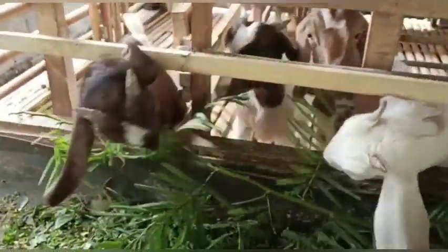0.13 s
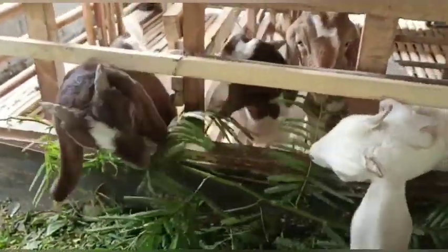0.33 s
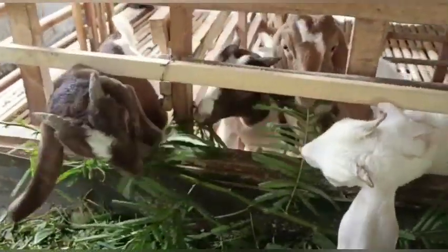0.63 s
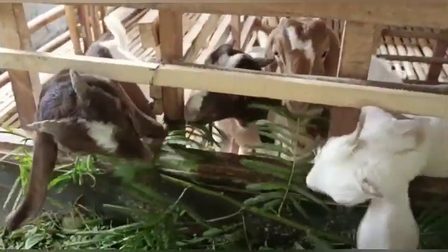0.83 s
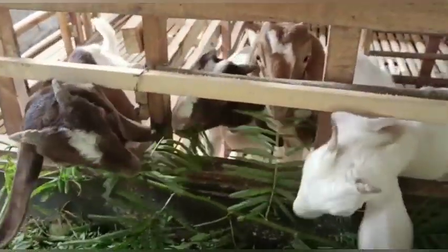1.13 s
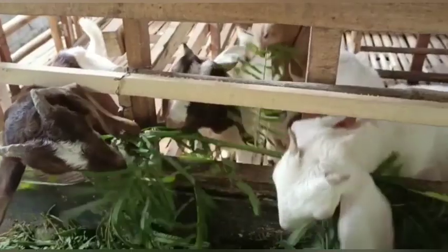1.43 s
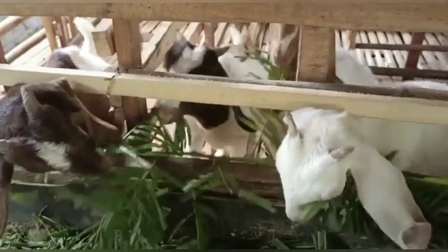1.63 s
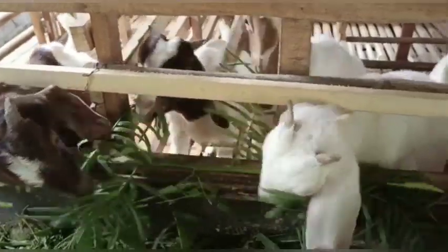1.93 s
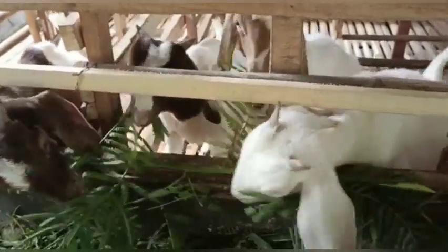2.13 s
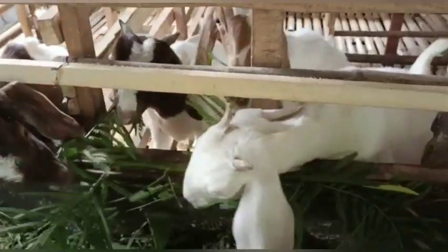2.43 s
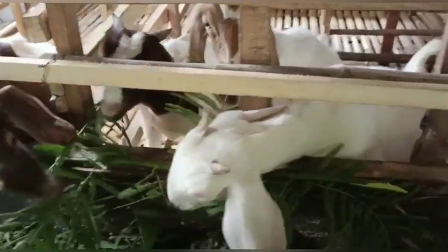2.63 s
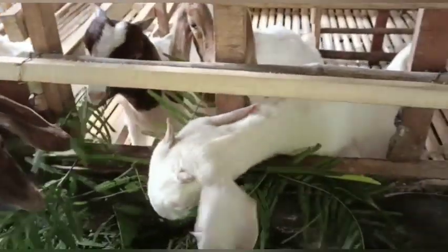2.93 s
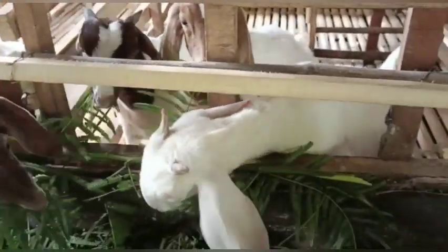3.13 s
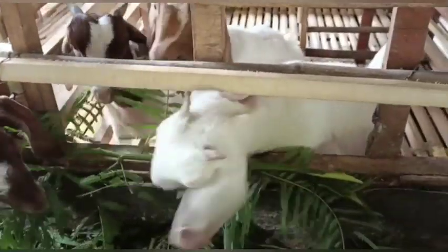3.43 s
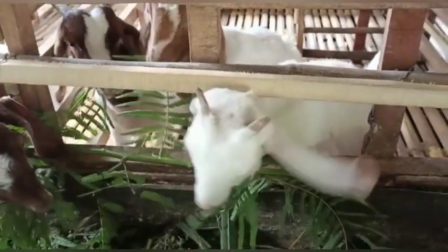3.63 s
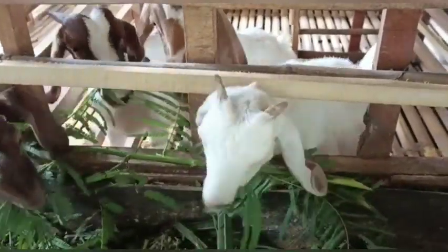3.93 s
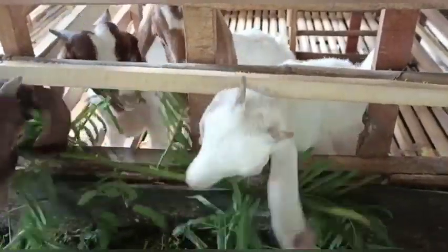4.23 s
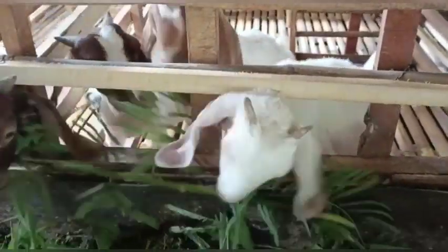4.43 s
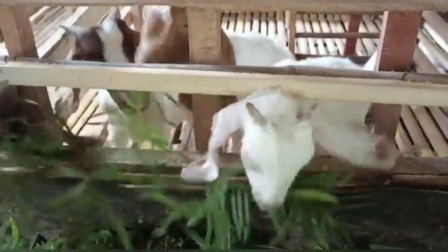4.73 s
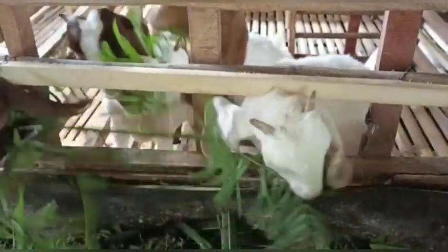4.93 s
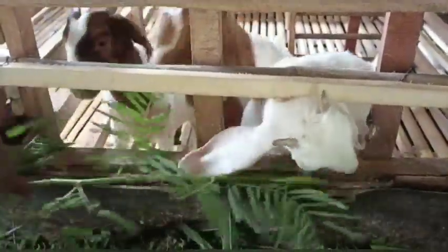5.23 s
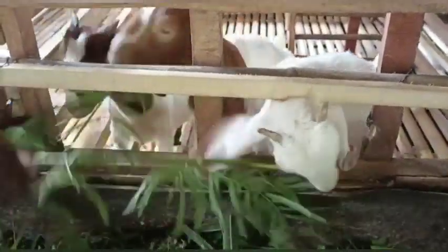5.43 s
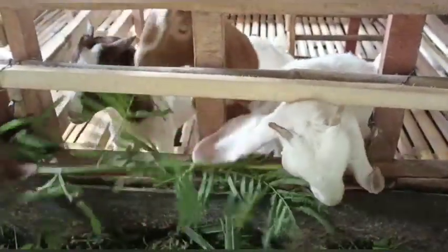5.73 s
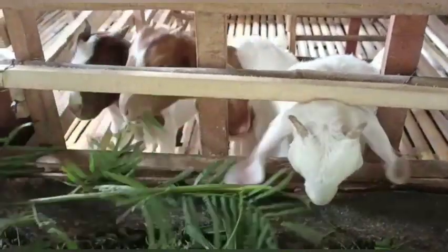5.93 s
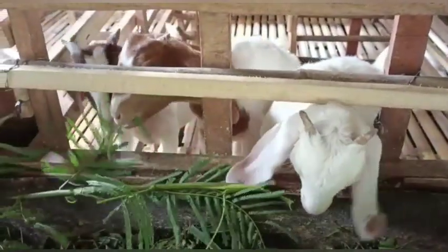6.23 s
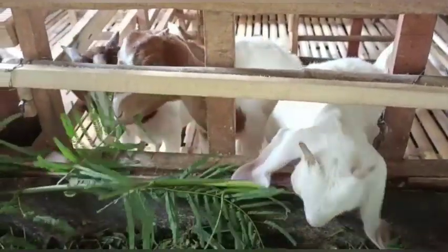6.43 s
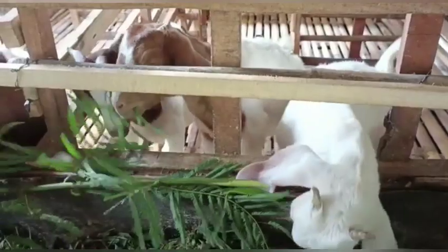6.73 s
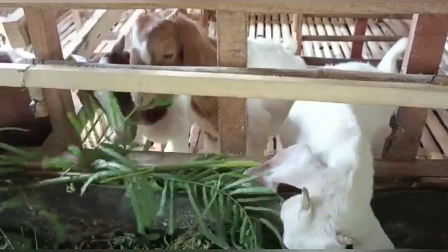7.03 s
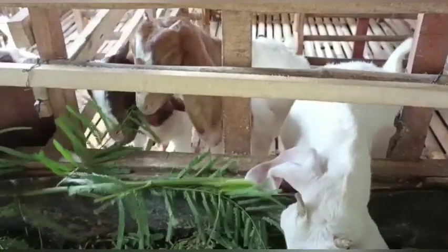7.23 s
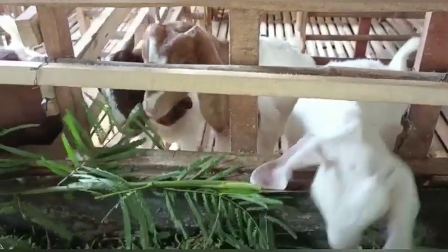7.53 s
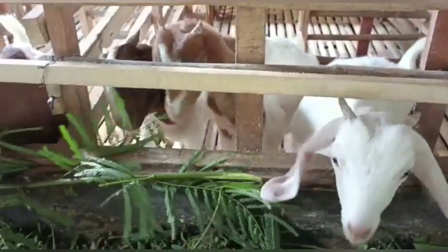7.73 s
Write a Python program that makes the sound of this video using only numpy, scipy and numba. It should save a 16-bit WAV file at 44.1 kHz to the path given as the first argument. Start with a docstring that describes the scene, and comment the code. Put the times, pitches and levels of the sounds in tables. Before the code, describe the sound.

A hoarse, nasal rasp, most likely a hand saw in timber, goes to and fro throughout in short uneven strokes, several a second. Each stroke rings with a slightly gliding honk and arrives mostly as short echo from a little way off. The strokes are fuller from about 3.5 seconds, ease briefly near 7 and return strongly just after. Closer by, goats feed in a slatted shed. Hooves and heads knock dully on the wooden pen around 1.5 seconds, in a cluster from 3.3 to 4, and again near 4.6, 5, 5.8 and 6.3. Stems snap sharply at about 1.2, 2.9, 3.6 and 5.8 seconds. Leaves rustle softly with each tug, most between 4 and 6 seconds. Brief wood squeaks come mainly in the first three seconds and again around 7. Underneath, the raised floor rumbles softly with shifting weight, over a faint, even wash of yard noise.

```python
"""A nasal rasp goes to and fro, most likely a hand saw, while goats feed at a trough in a slatted shed.
The saw is out of sight: its teeth make the timber and blade ring, and the honk arrives mostly as echo.
Rubbing wood squeaks, hooves and heads knock on the pen, stems snap and fodder leaves rustle.
Underneath, the raised floor rumbles as the goats shift their weight, and the yard murmurs faintly."""
import sys
import numpy as np
from scipy import signal
from scipy.fft import rfft, irfft, next_fast_len
from scipy.io import wavfile
from scipy.ndimage import uniform_filter1d
from numba import njit

SR = 44100
rng = np.random.default_rng(int(sys.argv[2]) if len(sys.argv) > 2 else 0)


def materialize(psi):
    """Save the field psi as 16-bit PCM at rate SR to the path in sys.argv[1].

    A 1-D psi becomes a single channel; in a 2-D psi each row is a channel.
    """
    bounded = np.clip(np.atleast_2d(psi).T, -1, 1)
    quanta = np.round(bounded * 32767).astype(np.int16)
    wavfile.write(sys.argv[1], SR, quanta)


N = 347067
T = np.arange(N) / SR


# Pushes and pulls of the saw: (start [s], length [s], fastest point [share of length], level [dB],
# treble bite [dB], low weight [dB], top tooth rate [Hz], honk pitch [Hz], honk glide [Hz])
SAW_STROKES = [(0, 0.08, 0.23, -56.5, 1.5, 0.5, 90.34, 1470, -10),
               (0.14, 0.21, 0.5, -42, -20, -7.5, 100.6, 1330, 516),
               (0.325, 0.17, 0.4, -50, -30.5, 0, 96.81, 1220, -150),
               (0.475, 0.2, 0.34, -54, -26, 11.5, 86.79, 1060, -250),
               (0.593, 0.25, 0.56, -46, -39, -7.5, 100.9, 1350, 347),
               (0.789, 0.17, 0.44, -38.5, -16, -3.5, 115.3, 1350, 156),
               (0.929, 0.18, 0.53, -53, -15, -25, 94.77, 1280, -56),
               (1.05, 0.31, 0.38, -50.5, -14.5, 11.5, 99.88, 1190, -250),
               (1.356, 0.14, 0.53, -47, -22, -34, 99.58, 1473, 101),
               (1.396, 0.23, 0.48, -39, -13.5, 5, 117.2, 1355, -250),
               (1.821, 0.14, 0.42, -47, -17, 8, 86.04, 1197, -250),
               (1.93, 0.12, 0.6, -64, -0.5, -30, 88.18, 1324, -1.5),
               (2.02, 0.25, 0.6, -40.5, -14, 3, 119.6, 1486, 350),
               (2.37, 0.12, 0.46, -46, -22, 1.5, 92.31, 1349, -100),
               (2.596, 0.12, 0.43, -46.5, -33, 5, 97.73, 1390, 12),
               (2.671, 0.26, 0.64, -37, -16.5, -9, 119.8, 1473, 250),
               (2.99, 0.17, 0.48, -63, -5.5, 12, 90.8, 1461, -2),
               (3.157, 0.17, 0.44, -40.5, -18.5, -15, 92.82, 1399, 452),
               (3.327, 0.17, 0.31, -41.5, -19.5, -9.5, 95.94, 1538, 4),
               (3.534, 0.29, 0.56, -41.5, -14, 2.5, 106.8, 1340, 300),
               (3.719, 0.2, 0.56, -37, -12.5, 2, 131.1, 1562, 94),
               (3.947, 0.19, 0.46, -43.5, -19.5, -5.5, 96.06, 1740, -100),
               (4.245, 0.3, 0.55, -36, -14, -2.5, 134.8, 1530, 301),
               (4.441, 0.22, 0.42, -39, -14.5, 2, 111.7, 1370, 0),
               (4.606, 0.16, 0.52, -41, -21.5, -6, 100.4, 1330, -150),
               (4.88, 0.22, 0.58, -36, -14, -5, 134.2, 1556, 150),
               (5.016, 0.28, 0.56, -38.5, -17, -3, 112.7, 1620, -8),
               (5.364, 0.23, 0.45, -44.5, -24.5, -22, 103.5, 1641, 1),
               (5.499, 0.22, 0.54, -37, -9, 0.5, 136.5, 1521, 143),
               (5.751, 0.29, 0.56, -38.5, -21, -1, 109.3, 1575, 188),
               (6.079, .15, 0.44, -43.5, -18.5, -6.5, 104.9, 1484, 200),
               (6.147, 0.2, 0.46, -36, -11, -1, 137, 1520, 147),
               (6.378, 0.13, 0.5, -63, -14, -26, 98.1, 1530, 3),
               (6.523, 0.29, 0.53, -38.5, -19, -7.5, 107.3, 1470, 396),
               (6.699, 0.26, 0.56, -37, -12.5, -1.5, 133.5, 1600, 120),
               (6.945, 0.12, 0.35, -55.5, -43, -33, 96.8, 1799, 200),
               (7.113, 0.15, 0.45, -54.5, -43, 0, 98.24, 1091, -52),
               (7.198, 0.11, 0.5, -56.5, -19, -20, 97.7, 1750, 4),
               (7.325, .16, 0.48, -37.5, -16, -6, 112.3, 1444, 245),
               (7.42, 0.19, 0.41, -36, -12.5, -2.5, 132, 1450, 154),
               (7.55, 0.16, 0.53, -46.5, -21.5, 0.5, 103.9, 1168, -150)]
def saw_strokes(tooth_sag=.28, ring_s=.15, catch_db=1.49):
    """A faster blade is louder, brighter and fuller, and its teeth strike more often."""
    tracks = np.zeros((5, N))
    for start, length, fastest, db, bite_db, weight_db, tooth_hz, honk_hz, glide_hz in SAW_STROKES:
        speed = arch(length, fastest) + 1e-6
        power = (undb(db) * speed ** .92) ** 2
        bite = undb(bite_db) * speed ** .22
        weight = undb(weight_db) * speed
        tooth_rate = tooth_hz * (1 - tooth_sag * (1 - speed))
        honk = honk_hz + glide_hz * np.linspace(-.5, .5, len(speed))
        for track, control in zip(tracks, (1, bite, weight, tooth_rate, honk)):
            add(track, start, power * control)
    decay = undb(-120 / (ring_s * SR))  # the timber rings on after a stroke
    ringing = signal.lfilter([1 - decay], [1, -decay], tracks)
    power, *controls = ringing + 1e-6 * tracks.mean(axis=1, keepdims=True)
    loudness = np.sqrt(power) * undb(catch_db * wander(40))  # the teeth catch and slip
    return loudness, *(controls / power)  # where strokes overlap, the louder one leads


# Tone of the rasp: (frequency [Hz], level [dB])
RASP_COLOUR = [(150, -10), (450, -18.5), (650, -8), (850, -6.5), (1200, 6.5), (1650, 1), (1950, -1.5),
               (2400, -10), (3100, -12), (3800, -15.5), (4450, -19), (5300, -25), (6300, -36.5),
               (9000, -108.5)]
# Notes at which blade and timber ring: (pitch [Hz], width [Hz], boost [dB])
TIMBER_NOTES = [(820, 45, 6), (950, 45, 3), (1225, 45, 3.5), (1420, 90, -2), (1562, 35, 3), (1620, 40, 2),
                (1748, 35, 2), (1876, 35, 3), (2564, 90, 3)]
# The broad, hoarse ring of the teeth: (pitch [Hz], width [Hz], boost [dB])
TOOTH_RING = [(3950, 900, 5.5)]
def saw_teeth(tooth_hz, waver=.022, tear_share=.29):
    """Each tooth strikes the wood, then tears fibres. Gives the whole rasp and the tearing alone."""
    teeth_passed = np.cumsum(tooth_hz * (1 + waver * wander(25))) / SR
    tooth = teeth_passed.astype(int)
    timing, strength = rng.standard_normal((N // 200, 2))[:tooth[-1] + 1].T
    force = undb(2 * strength)
    strike_at = np.searchsorted(teeth_passed, np.arange(len(force)) + .005 * timing)
    strikes = np.zeros(N)
    strikes[np.minimum(strike_at, N - 1)] = force
    tearing = rng.standard_normal(N) * np.exp(-(teeth_passed % 1) / tear_share) * force[tooth]
    splinters = grains(260, spread_db=4.3)
    drive = unit(strikes) + undb(-9.5) * unit(tearing) + undb(-12) * splinters
    # as the blade slides, its sound takes changing paths and its notes come and go
    paths = np.array([wander(9) for _ in range(4)])
    paths /= np.sqrt(np.sum(paths ** 2, axis=0))
    rasp = sum(shed(drive * share, ring_s=.16, direct_db=-17) for share in paths)
    rasp = patchy(rasp, depth_db=5, width_hz=170, hold_s=.055)
    return colour(rasp, RASP_COLOUR, TIMBER_NOTES + TOOTH_RING), tearing


# Higher rings of the blade: (pitch [multiple of the honk], width [Hz], level [dB])
HONK_OVERTONES = [(2.1, 400, 0), (2.65, 800, 4)]
def saw(full_stroke_db=-41.5, honk_db=6, honk_width_hz=276., echo_db=-17):
    """The rasp rings the blade in a nasal honk whose pitch moves with the blade's free length."""
    loudness, bite, weight, tooth_hz, honk_hz = saw_strokes()
    rasp, tearing = saw_teeth(tooth_hz)
    low = colour(rasp, [(480, -8), (650, -4), (800, 1), (900, 1), (1020, -5), (1150, -50)])
    middle = colour(rasp, [(850, -50), (1000, -6), (1100, 0), (1900, 0), (2120, -6), (2450, -50)])
    top = colour(rasp, [(1850, -50), (2120, -6), (2400, 0)])
    honk = np.array([resonate(side, honk_hz, honk_width_hz) for side in middle])
    breadth = (loudness / undb(full_stroke_db)) ** .94  # gentle strokes narrow to just the honk
    middle = breadth * middle + undb(honk_db) * honk
    overtones = sum(undb(db) * np.array([resonate(side, ratio * honk_hz, float(width)) for side in top])
                    for ratio, width, db in HONK_OVERTONES)
    top = patchy(top + overtones, depth_db=3.5, width_hz=300, hold_s=.06)
    cutting = weight * undb(-12) * steady(low) + undb(-.22) * steady(middle) + bite * steady(top)
    sound = loudness * cutting + singing_blade(tearing, loudness, honk_hz)
    return sound + undb(echo_db) * shed(sound[0], ring_s=.22, direct_db=-24.5)


# Long-ringing notes of the blade: (pitch [Hz], width [Hz], relative level [dB])
BLADE_NOTES = [(828, 11, -11), (1006.3, 51, -4.5), (1233, 30, 5), (1623.6, 59, 2), (2113, 31, -8)]
def singing_blade(tearing, loudness, honk_hz, bend=.0091, fall_db_per_octave=18):
    """The teeth keep the blade singing, most of all near the honk; its notes waver as it flexes."""
    flex = 1 + bend * wander(12)
    ring = np.zeros(N)
    for hz, width, db in BLADE_NOTES:
        note = resonate(tearing, hz * flex, float(width))
        note = resonate(note, hz * flex, float(width))  # a second pass makes it purer
        octaves_away = np.abs(np.log2(hz / honk_hz))
        ring += undb(db - fall_db_per_octave * octaves_away + 3 * wander(16)) * unit(note)
    level = undb(-46) * (loudness / undb(-37.5)) ** 1.25  # grows faster than the stroke does
    return level * steady(shed(ring, ring_s=.21, direct_db=1))


# Rubbing wood: (start [s], length [s], first pitch [Hz], last pitch [Hz], level [dB])
WOOD_SQUEAKS = [(0.162, 0.077, 1037, 1183, -44.5), (0.338, 0.036, 1210, 1320, -43.5),
                (0.392, 0.026, 1245, 1190, -47), (0.455, 0.028, 3590, 3100, -53.5),
                (0.479, 0.047, 2900, 2420, -58.5), (0.762, 0.033, 1150, 1140, -40),
                (0.938, .17, 3850, 3780, -64.5), (0.949, 0.16, 1245, 1172, -52),
                (1.816, 0.042, 1312, 1250, -46.5), (2.384, 0.05, 1443, 1290, -44),
                (2.604, 0.043, 1332, 1294, -43.5), (5.057, 0.084, 623, 573, -55),
                (6.531, 0.037, 1203, 1201, -46.5), (7.154, 0.043, 1030, 1104, -47.5),
                (7.297, 0.053, 1241, 1280, -43.5)]
def wood_squeaks(waver=.033, overtone_db=-38):
    """Wood sticks and slips for a moment in a rough, wavering tone."""
    track = np.zeros(N)
    for start, length, first_hz, last_hz, db in WOOD_SQUEAKS:
        progress = np.linspace(0, 1, int(length * SR))
        wobble = unit(uniform_filter1d(rng.standard_normal(SR // 4), size=90))[:len(progress)]
        hz = (first_hz + (last_hz - first_hz) * progress) * (1 + waver * wobble)
        phase = 2 * np.pi * np.cumsum(hz) / SR
        tone = np.sin(phase) + undb(overtone_db) * np.sin(2 * phase)
        add(track, start, undb(db) * np.sqrt(2) * np.sin(np.pi * progress) * tone)
    return shed(track, ring_s=.2, direct_db=-5)


# Notes of the wooden pen: (pitch [Hz], relative level [dB], free ring time [s])
PEN_NOTES = [(70, -5, .28), (90, 0, .4), (118, -4, .3), (156, 0, .2), (184, -3, .18), (221, -4, .2),
             (247, 0, .19), (292, 0, .2), (320, -4, .16), (420, -6, .14), (504, -3, .14), (575, -5, .14),
             (641, -2, .14), (727, -2, .16), (800, -3, .12)]
def pen_ring(t, board_hz, fall_db_per_octave=10.5, ring_share=.68, board_ring_s=.17):
    """A struck board sounds its hollow note and wakes the pen's notes that lie close to it."""
    ring = undb(5 - 60 * t / board_ring_s) * np.sin(2 * np.pi * board_hz * t)
    for hz, db, ring_s in PEN_NOTES:
        strength, detune = rng.standard_normal(2)
        start_db = db + 3 * strength - fall_db_per_octave * abs(np.log2(hz / board_hz))
        fade_db = 60 * t / (ring_s * ring_share)  # the goats' weight shortens the ring
        ring += undb(start_db - fade_db) * np.sin(2 * np.pi * hz * (1 + .031 * detune) * t)
    return ring


# Blows on the pen, with three relative levels:
# (time [s], floor boom [dB], plank [dB], slat [dB], board pitch [Hz], contact time [s])
PEN_KNOCKS = [(0.019, -86, -72.5, -64, 626, 0.018), (0.5, -93, -59.5, -55.5, 288, 0.016),
              (0.568, -59.5, -61, -65.5, 99.8, 0.021), (1.045, -79, -60, -55.5, 619, 0.022),
              (1.05, -52, -54, -66, 109, 0.0044), (1.098, -76, -64, -55, 630, 0.011),
              (1.14, -77, -51, -46, 474, 0.016), (1.177, -69, -50, -78, 291.4, 0.0034),
              (1.225, -74, -68, -56.5, 313, 0.0054), (1.513, -46.5, -43.5, -49, 246, 0.0089),
              (1.557, -38, -41, -53.5, 100, 0.0089), (1.639, -44, -57.5, -54, 100, 0.003),
              (1.742, -53, -58.5, -60, 509.3, 0.0073), (2.205, -49.5, -73, -76, 112, 0.0073),
              (2.406, -78, -63, -88, 79.83, 0.0093), (2.744, -88, -54.5, -63.5, 196, 0.011),
              (2.872, -79, -49.5, -46, 247, 0.022), (3.113, -68, -59, -74, 159.4, 0.038),
              (3.343, -42.5, -40.5, -55, 241.7, 0.0061), (3.362, -70, -40, -48.5, 483.4, 0.012),
              (3.378, -41, -36.5, -56, 177.3, 0.0092), (3.43, -41.5, -58, -69, 133, 0.0064),
              (3.547, -48, -65, -49, 408, 0.015), (3.545, -82, -64, -51.5, 682, 0.007),
              (3.576, -42.5, -50.5, -48.5, 127.9, 0.014), (3.794, -43, -49, -76, 85.2, 0.0082),
              (3.805, -61, -47, -66, 264.2, 0.026), (3.822, -54, -71, -47.5, 578, 0.01),
              (3.889, -44, -38.5, -75, 305, 0.0033), (3.917, -35.5, -40, -79, 275, 0.013),
              (3.964, -44, -45.5, -49.5, 255, 0.013), (4.08, -47.5, -67.5, -72, 79, 0.012),
              (4.283, -71, -54, -67, 331.4, 0.0097), (4.588, -49, -45, -80, 243, 0.015),
              (4.639, -74, -50, -55.5, 248.1, 0.015), (4.985, -46, -44.5, -54, 305, 0.014),
              (5.279, -68, -84, -60.5, 595.8, 0.0062), (5.6, -65, -69, -50, 576, 0.0074),
              (5.768, -56, -45.5, -55.5, 250.2, 0.016), (5.797, -49, -43, -50.5, 187.9, 0.018),
              (6.294, -56, -44, -61, 228.3, 0.0096), (6.298, -75, -54, -47, 735, 0.016),
              (6.334, -39.5, -44.5, -61, 159.9, 0.013)]
def pen_knocks(rattle_db=-25):
    """A hoof or head hits the pen; the blow and a short rattle of loose slats set it ringing."""
    track, t = np.zeros(N), T[:SR * 3 // 5]
    for start, boom_db, plank_db, slat_db, board_hz, contact_s in PEN_KNOCKS:
        ring = pen_ring(t, board_hz)
        rattle_shape = t / contact_s * np.exp(1 - t / contact_s)
        push = undb(rattle_db) * rng.standard_normal(len(t)) * rattle_shape
        push[0] += 1  # the blow itself
        knock = signal.fftconvolve(ring, push)[:len(t)]
        for low_hz, high_hz, db in (78, 140, boom_db - 2), (145, 360, plank_db), (380, 850, slat_db - 1):
            part = band(knock, low_hz, high_hz, order=2)
            add(track, start, part * undb(db) / np.std(part[:SR // 20]))
    return shed(track, ring_s=.17, direct_db=7)


# Tone of a crack: (frequency [Hz], level [dB])
CRACK_TONE = [(300, -14), (700, -5), (1150, 0), (1700, -3), (2600, -9), (3700, -13), (5000, -26),
              (6300, -36), (7200, -30), (8200, -24), (9200, -30), (10200, -25), (11500, -37), (15500, -36)]
# Sharp cracks: (time [s], low clack [dB], middle snap [dB], high fizz [dB], breaking time [s])
STEM_CRACKS = [(1.103, -37.5, -45, -67, 0.007), (1.178, -27, -37, -67, 0.0063),
               (1.182, -33, -35, -56, 0.0034), (1.2, -49, -63, -73, .012), (1.226, -45, -63, -75, .007),
               (1.525, -53, -43.5, -81, 0.0069), (1.858, -47.5, -71, -77, 0.0024),
               (2.152, -47, -40, -78, 0.019), (2.828, -53, -47.5, -81, 0.0023),
               (2.847, -44, -59, -87, 0.0021), (2.866, -36, -53, -89, 0.022),
               (2.892, -37, -57, -90, 0.0036), (3.159, -82, -80, -67, 0.011),
               (3.624, -41.5, -40.5, -56, 0.0062), (4.044, -68, -63, -83, 0.0051),
               (4.292, -45, -50, -64, 0.005), (4.329, -58, -47, -55, 0.0035),
               (4.356, -50, -44.5, -77, 0.0078), (4.555, -43.5, -40.5, -79, 0.00068),
               (4.974, -43, -57, -83, 0.00091), (5.009, -44, -56, -85, 0.0013),
               (5.036, -47, -56, -82, .0012), (5.297, -45.5, -52, -79, 0.0049),
               (5.778, -41.5, -45, -91, .02), (5.791, -36.5, -52.5, -90, 0.031)]
def stem_cracks(splinter_s=.016, clean_break_s=.008, trim_db=-2):
    """Stems snap and horns hit wood: a click, a burst of breaking fibres, then brief splintering."""
    track, t = np.zeros(N), T[:SR // 6]
    for start, *levels_db, break_s in STEM_CRACKS:
        fade = np.exp(-t / break_s) + undb(-19) * np.exp(-t / splinter_s)
        fibres = rng.standard_normal(len(t)) * fade
        fibres[SR // 1000] += undb(22) * np.exp(-break_s / clean_break_s)  # only quick breaks click
        burst = colour(fibres, CRACK_TONE)[:SR // 8]
        for (low_hz, high_hz), db in zip(((400, 2200), (2200, 6000), (7000, 15500)), levels_db):
            part = band(burst, low_hz, high_hz)
            add(track, start, part * undb(db + trim_db) / np.std(part[:SR // 100]))
    return shed(track, ring_s=.21, direct_db=4)


# Tone of the leaves: (frequency [Hz], level [dB])
LEAF_TONE = [(1500, -18), (3500, 7.5), (4500, 3), (6300, -16), (7200, -3), (8400, 6), (9200, -7),
             (10200, 4), (11500, -18), (13000, -12.5), (15500, -18)]
# Tugs at the fodder: (start [s], length [s], treble level [dB])
FODDER_TUGS = [(0.045, 0.078, -69.5), (0.666, 0.38, -76.5), (1.06, 0.32, -63.5), (1.325, 0.054, -74),
               (1.43, 0.19, -69), (1.93, 0.18, -74), (2.132, 0.12, -64.5), (3.11, 0.1, -73),
               (4.02, 0.11, -70.5), (4.24, 0.29, -68), (4.54, 0.19, -61), (4.718, 0.049, -61.5),
               (4.76, 0.38, -78.5), (4.94, 0.29, -73), (5.23, 0.22, -64), (5.41, 0.14, -73),
               (5.56, 0.15, -69), (5.67, 0.22, -66.5), (6.15, 0.23, -85), (6.53, 0.29, -73),
               (6.928, 0.076, -72), (7.255, 0.075, -67)]
def rustling_leaves(nibble_db=-83.5, tick_db=-8):
    """Leaves flick and crackle as the goats nibble, with crisp ticks and a swell at every tug."""
    nibbling = undb(nibble_db + 3 * wander(6.8))
    loudness = np.hypot(swells(FODDER_TUGS, peak_share=.33), nibbling)
    near, left, right = (grains(300, spread_db=4.6) + .45 * rng.standard_normal(N) for _ in range(3))
    near += undb(tick_db) * grains(22, spread_db=3)
    rustle = shed(near, ring_s=.09, direct_db=-1) + .5 * np.array([left, right])
    rustle = colour(patchy(rustle, depth_db=4, width_hz=500, hold_s=.025), LEAF_TONE)
    return rustle * loudness / np.std(band(rustle, 7000, 15000))


# Tone of the slatted floor: (frequency [Hz], level [dB])
FLOOR_TONE = [(25, -12), (50, 1), (85, 14.5), (120, -2), (170, -1), (230, -4.5), (400, -15), (800, -10),
              (2000, -66.5)]
# Goats shifting their weight: (start [s], length [s], level [dB])
GOAT_STEPS = [(0.5, 0.23, -68), (1.4, 0.6, -63), (1.54, 0.23, -57.5), (2.08, 0.16, -51.5), (2.7, 0.3, -74),
              (3.38, 0.37, -57), (3.78, .4, -54), (4.4, 0.24, -57.5), (4.87, 0.42, -58.5),
              (5.42, 0.87, -63.5), (6.45, 0.33, -62.5), (6.85, 0.4, -90), (7.25, 0.63, -58.5)]
def floor_rumble(restless_db=-73):
    """Soft footfalls keep the raised floor rumbling, louder at each step."""
    footfalls = shed(grains(80, spread_db=2.5), ring_s=.15, direct_db=0)
    rumble = colour(patchy(footfalls, depth_db=4, width_hz=100, hold_s=.04), FLOOR_TONE)
    return unit(rumble) * np.hypot(swells(GOAT_STEPS, peak_share=.38), undb(restless_db))


# Tone of the background: (frequency [Hz], relative level [dB])
YARD_TONE = [(18, -52), (30, -45.5), (102, -3), (277, -13), (443, -14), (897, -22), (1230, -6), (1590, 4),
             (2180, -21.5), (3780, -29), (6210, -60), (7200, -45), (8400, -34), (9200, -41), (10100, -38),
             (11300, -56), (15500, -54)]
def yard_air(level_db=-64):
    """The yard adds a faint, even wash of noise."""
    noise = shed(rng.standard_normal(N), ring_s=.0095, direct_db=-1)
    return unit(colour(noise, YARD_TONE)) * undb(level_db)


# How alike the echo is on the left and right: (frequency [Hz], likeness [-1 to 1])
ECHO_LIKENESS = [(60, .95), (300, .86), (650, .4), (900, .1), (1300, -.3), (1700, -.15), (2300, 0),
                 (15000, 0)]
def shed(x, ring_s, direct_db):
    """Sound arrives directly and as a blur of echoes that fades by 60 dB in ring_s."""
    t, lead, lag = T[:SR // 2], 256, 8  # lead and lag count samples
    tail = rng.standard_normal((2, len(t))) * undb(-60 * t / ring_s)
    tail /= np.sqrt(np.sum(tail ** 2, axis=1, keepdims=True))
    alike = np.clip(along(ECHO_LIKENESS, bins(t)), -.99, .99)
    shares = np.sqrt([(1 + alike) / 2, (1 - alike) / 2])
    mid, side = irfft(rfft(np.roll(tail, lead, axis=1)) * shares, len(t))
    response = np.array([mid + side, mid - side])
    response[[0, 1], [lead, lead + lag]] += undb(direct_db)  # the left side is reached first
    heard = signal.fftconvolve(x[None], response, axes=1)[:, lead:lead + N]
    return heard / np.sqrt(1 + undb(direct_db) ** 2)


def undb(db):
    """Turn decibels into a multiplier."""
    return 10 ** (np.asarray(db) / 20)


def unit(x):
    """Scale to an average strength (rms) of 1."""
    return x / np.sqrt(np.mean(x ** 2) + 1e-30)


def steady(x):
    """Even out slow swells, keeping the fine grain."""
    return x / np.sqrt(uniform_filter1d(np.mean(x ** 2, axis=0), SR // 26) + 1e-12)


def add(track, start_s, sound):
    """Mix a sound in at a given time."""
    start = max(int(start_s * SR), 0)
    track[start:start + len(sound)] += sound[:N - start]


def arch(length_s, peak_share):
    """A movement that starts at rest, reaches speed 1 at a share of its length and stops again."""
    progress = np.linspace(0, 1, int(length_s * SR))
    skew = np.log(.5) / np.log(np.clip(peak_share, .05, .95))
    return np.abs(np.sin(np.pi * progress ** skew))


def swells(rows, peak_share):
    """The loudness of a row of movements, each rising and dying away."""
    track = np.zeros(N)
    for start, length, db in rows:
        add(track, start, undb(db) * arch(length, peak_share) ** 2)
    return track


def wander(per_second):
    """A smooth random curve, typically about 1 away from zero."""
    hold = int(SR / per_second)
    steps = np.repeat(rng.standard_normal(N // hold + 1), hold)
    return unit(uniform_filter1d(steps, hold)[:N])


def grains(per_second, spread_db):
    """Tiny random clicks, most weak and a few strong."""
    size = undb(spread_db * np.minimum(rng.exponential(size=N), 4))
    return unit((rng.random(N) < per_second / SR) * size * rng.choice([-1, 1], N))


def bins(x):
    """The frequencies that make up x."""
    return np.maximum(np.fft.rfftfreq(x.shape[-1], 1 / SR), 1)


def along(points, hz):
    """Read between (frequency, value) points, giving every octave equal room."""
    point_hz, value = np.transpose(points)
    return np.interp(np.log(hz), np.log(point_hz), value)


def colour(x, points, notes=()):
    """Shape the tone with a broad curve, plus peaks for ringing notes."""
    size = next_fast_len(x.shape[-1], True)
    hz = bins(np.empty(size))
    peaks_db = sum(db / (1 + (2 * (hz - pitch) / width) ** 2) for pitch, width, db in notes)
    return irfft(rfft(x, size) * undb(along(points, hz) + peaks_db), size)[..., :x.shape[-1]]


def band(x, low_hz, high_hz, order=3):
    """Keep what lies between two frequencies."""
    return signal.sosfilt(signal.butter(order, [low_hz, high_hz], "band", fs=SR, output="sos"), x)


@njit
def resonate(x, hz, width):
    """A ringing filter that lets through the sound around a moving pitch."""
    y, band_state, low_state = np.empty(len(x)), 0., 0.
    for i in range(len(x)):
        tuning, damping = np.tan(np.pi * hz[i] / SR), width / hz[i]
        swing = (band_state + tuning * (x[i] - low_state)) / (1 + tuning * (tuning + damping))
        band_state = 2 * swing - band_state
        low_state += 2 * tuning * swing
        y[i] = damping * swing
    return y


def patchy(x, depth_db, width_hz, hold_s):
    """Let narrow ranges of pitch swell and fade on their own."""
    _, _, cells = signal.stft(x, nperseg=512, noverlap=384)
    field = rng.standard_normal(cells.shape[-2:])
    for axis, reach in enumerate((width_hz * 512 / SR, hold_s * SR / 128)):
        for _ in range(2):
            field = uniform_filter1d(field, max(int(reach), 1), axis=axis)
    gain = unit(undb(depth_db * unit(field)))
    return signal.istft(cells * gain, nperseg=512, noverlap=384)[1][..., :N]


def scene():
    """Everything heard at the trough."""
    return (saw() + wood_squeaks() + pen_knocks() + stem_cracks()
            + rustling_leaves() + floor_rumble() + yard_air())


# Tone balance of the two microphones: (frequency [Hz], left minus right [dB])
MIC_BALANCE = [(60, -.7), (200, .8), (1000, .5), (2000, -.7), (4000, -1.5), (8000, -1), (12000, 4)]
def record(dry, bass_hz=58, top_hz=15750):
    """Two microphones, each with its own tone, thin the deepest bass and cut the highest treble."""
    heard = np.array([colour(channel, [(hz, side * db / 2) for hz, db in MIC_BALANCE])
                      for channel, side in zip(dry, (1, -1))])
    thinned = signal.sosfilt(signal.butter(2, bass_hz, "high", fs=SR, output="sos"), heard)
    return signal.sosfilt(signal.ellip(10, .2, 70, top_hz, fs=SR, output="sos"), thinned)


dry = scene()
out = record(dry)
materialize(out)
```